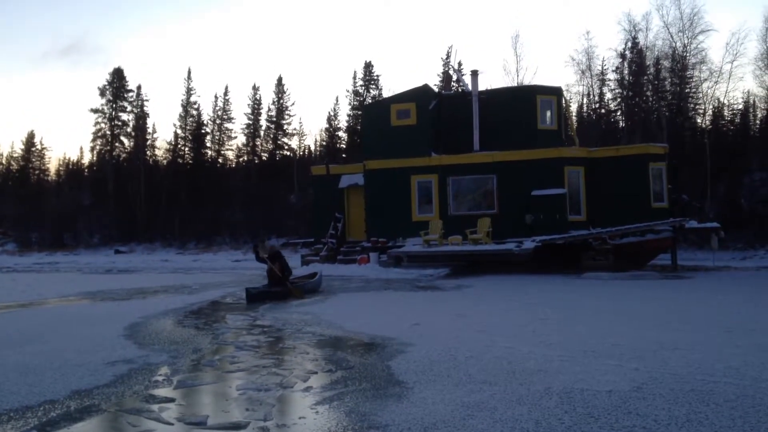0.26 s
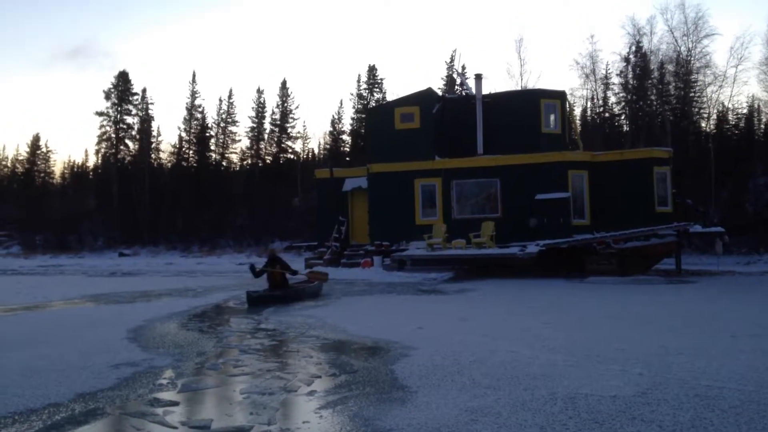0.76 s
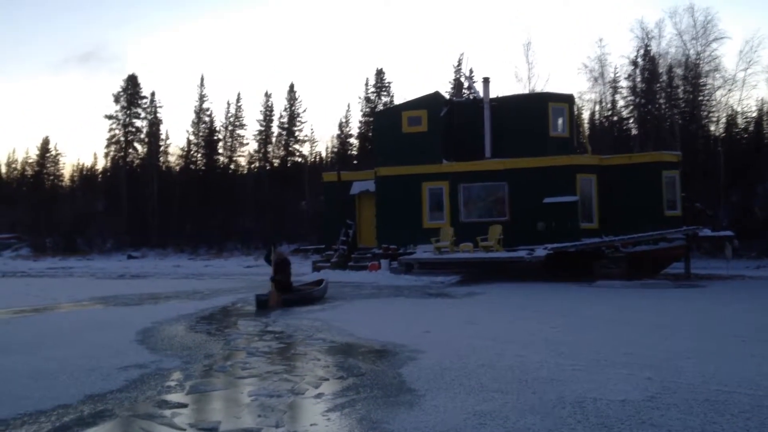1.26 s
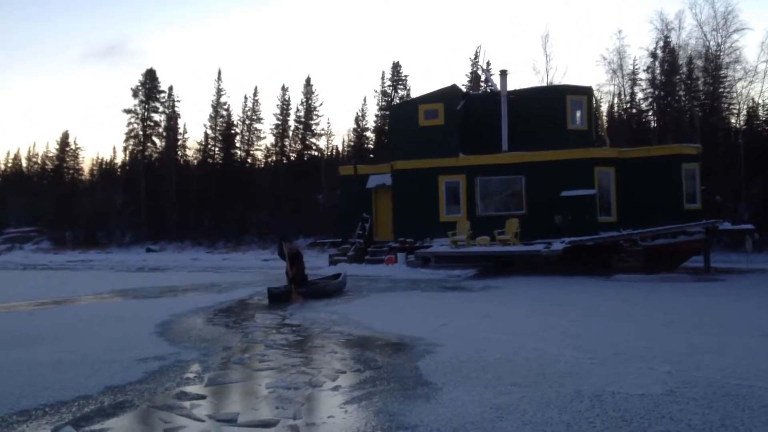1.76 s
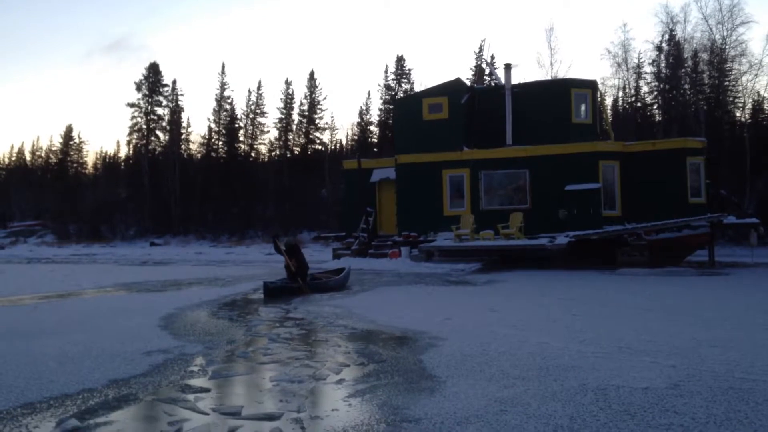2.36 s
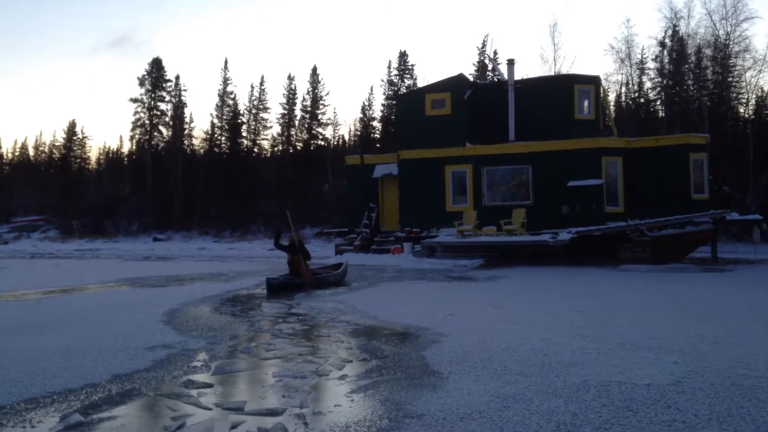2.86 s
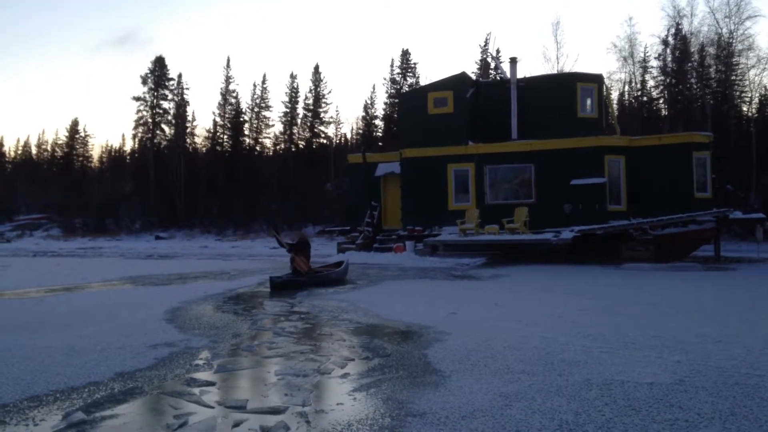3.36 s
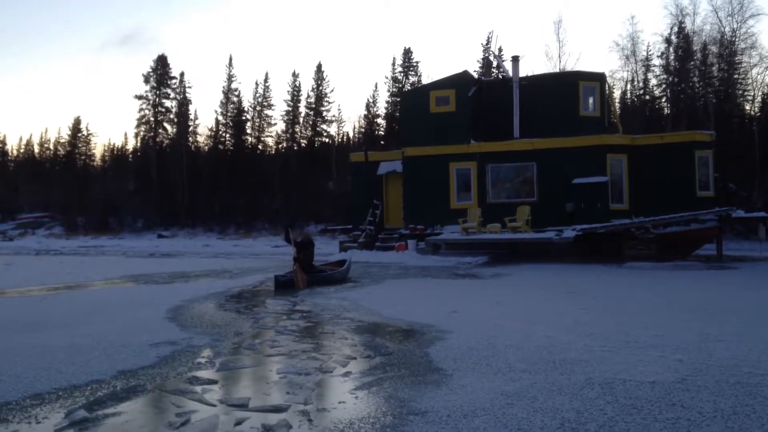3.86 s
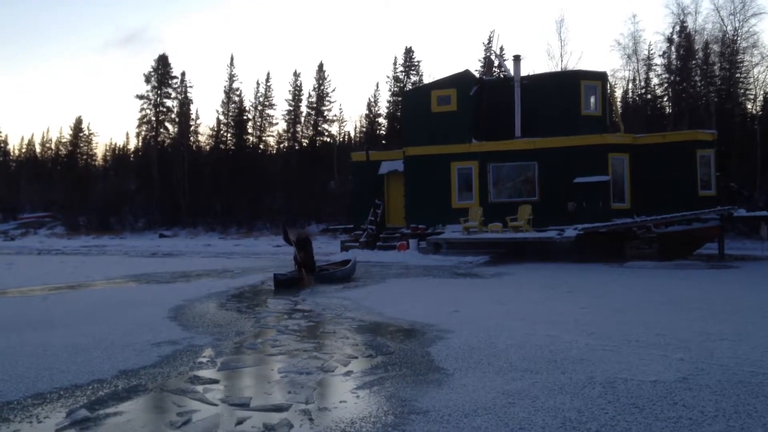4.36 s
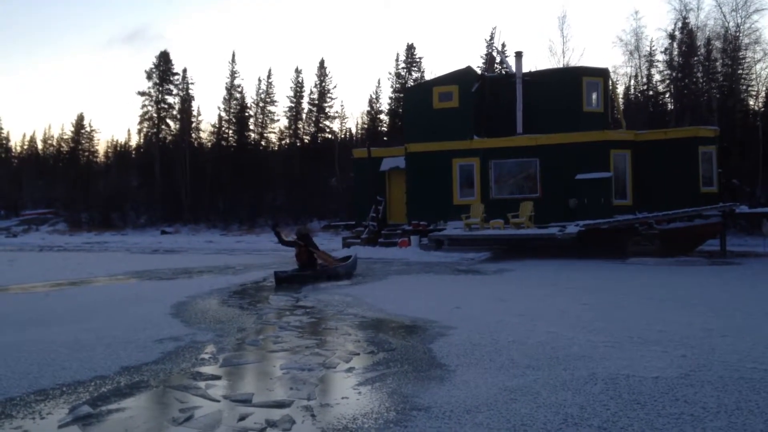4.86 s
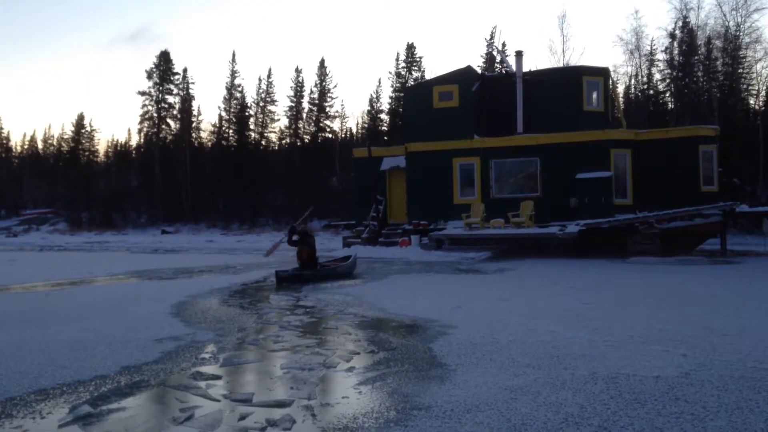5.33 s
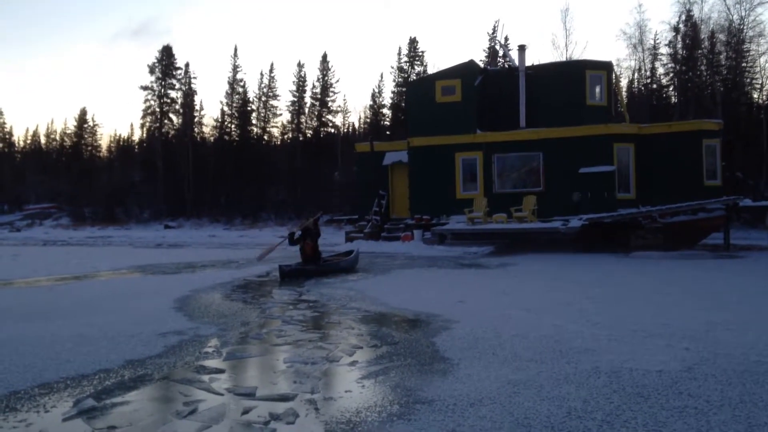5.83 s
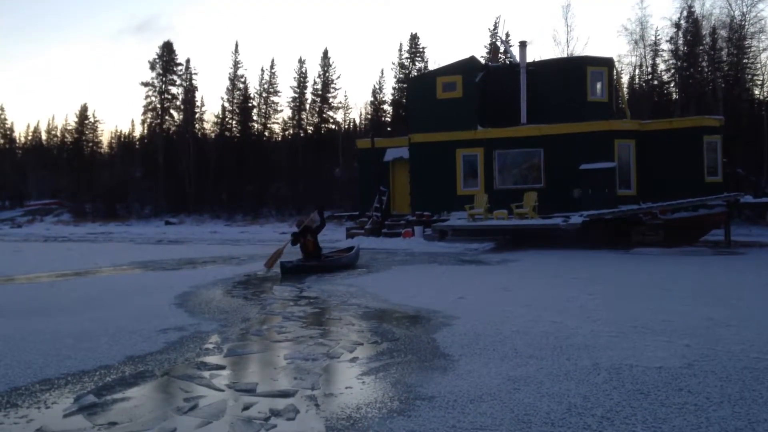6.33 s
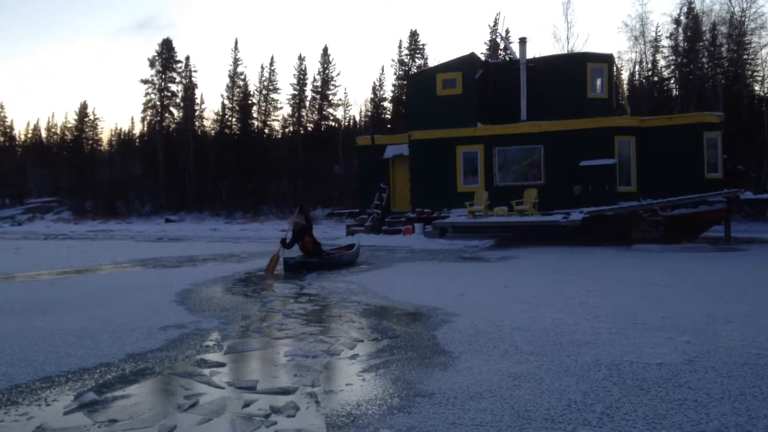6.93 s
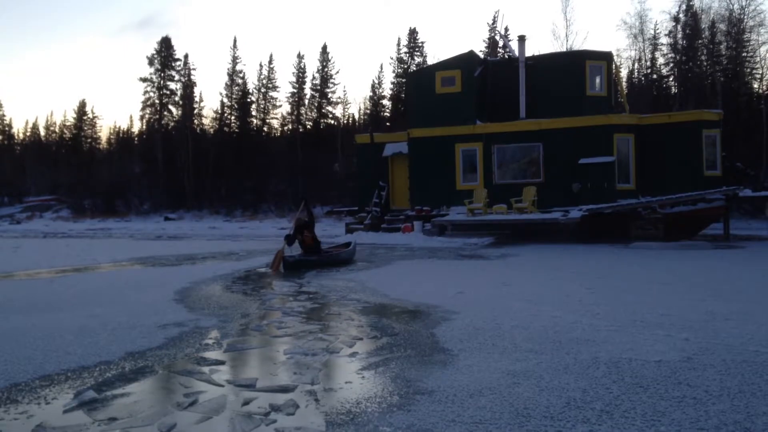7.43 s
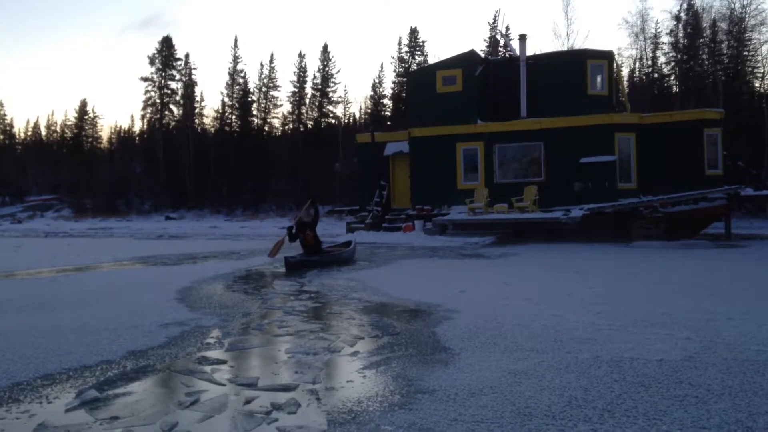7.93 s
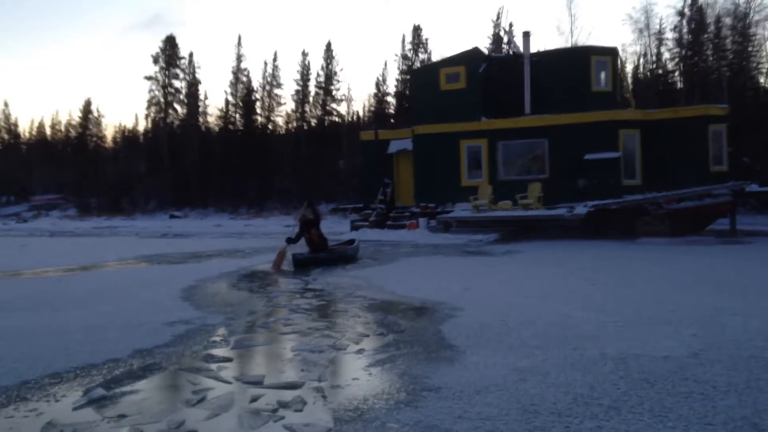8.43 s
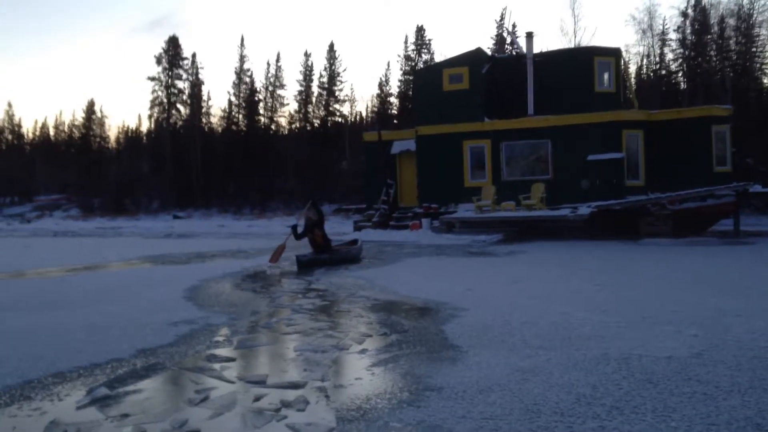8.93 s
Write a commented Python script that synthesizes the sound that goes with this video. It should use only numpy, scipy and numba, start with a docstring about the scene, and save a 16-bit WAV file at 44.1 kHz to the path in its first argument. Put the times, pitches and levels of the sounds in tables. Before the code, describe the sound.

A still, cold lake, heard from some distance, with faint hiss and barely any wind. From 0 to 1.3 seconds a canoe grinds softly against thin ice, with small cracks near 0.4 and 0.9. At 1.4 a very loud, sharp snap begins a heavy burst: crunching, glassy shards and hollow rumbling of slabs under the hull, strongest until about 2.3, with further knocks to 2.9. Quiet follows, with a faint rustle and a drip near 3.7. At 4.0 another crack opens a second dense crunch, hard and splintery until 4.8, then fading with a light trickle. Low thumps and a drip come around 5.5, soft swishes near 6.1. A snap and short crunch strike at 6.6; scraping and crackle run from 7.0 to 7.5. A loud crack with a deep knock hits at 8.2, dull thumps and low wind follow, and a final snap at 9.16. Breaks return one dull echo.

```python
"""Across open lake water on a still, cold morning, a canoe is shoved through thin ice some way off.
The hull rumbles over slabs, while the ice crunches into ringing shards, snaps and ticks.
Slush, a jacket and the paddle swish softly; the paddle also scrapes and drips, and low thumps sound.
Noise bursts and short ringing tones make these sounds.
A wall behind the boat sends back one dull echo, and a light wind and faint hiss lie underneath."""
import sys
import numpy as np
from scipy import signal
from scipy.fft import rfft, irfft
from scipy.io import wavfile
from scipy.ndimage import uniform_filter1d
from numba import njit

SR = 44100
rng = np.random.default_rng(int(sys.argv[2]) if len(sys.argv) > 2 else 0)


def output_pcm(signal):
    """Save a mono or channel-first signal as 16-bit PCM at the path in sys.argv[1].

    Samples are clipped to [-1, 1] before scaling.
    """
    pcm = np.clip(np.atleast_2d(signal).T, -1, 1) * 32767
    wavfile.write(sys.argv[1], SR, np.round(pcm).astype(np.int16))


N = 405274

# panels of the bow that scraping ice or the paddle sets ringing:
# (pitch [Hz], width [Hz], relative level [dB])
BOW_PANELS = [(773, 55, -15.5), (1650, 600, -16.5), (1980, 100, -21.5)]


def undb(db):
    """Turn decibels into a gain to multiply by."""
    return 10 ** (np.asarray(db) / 20)


def level(x, db):
    """Scale a sound to an average (rms) level in dB."""
    return x * undb(db) / np.sqrt(np.mean(x ** 2))


def colour(x, points):
    """Shape the spectrum through (Hz, dB) points, with a filter that never sounds ahead of its input."""
    hz, db = np.transpose(points)
    grid = np.maximum(np.fft.rfftfreq(2 ** 12, 1 / SR), 1)
    gain = undb(np.interp(np.log(grid), np.log(hz), db))
    # folding the cepstrum (the transform of the log gain) puts the whole response after time zero
    cepstrum = irfft(np.log(gain))
    half = len(cepstrum) // 2
    cepstrum[1:half] *= 2
    cepstrum[half + 1:] = 0
    response = irfft(np.exp(rfft(cepstrum)))
    return signal.fftconvolve(x, response)[:len(x)]


def resonance(x, hz, width_hz):
    """Let through a band round one pitch, as a ringing body does; the gain is 1 at the centre."""
    return signal.lfilter(*signal.iirpeak(min(hz, .45 * SR), hz / width_hz, fs=SR), x)


def walk(rate):
    """Wander at random: levels drawn `rate` times a second and smoothed twice, with a spread near 1."""
    hold = int(SR / rate)
    steps = np.repeat(rng.standard_normal(1000), hold)[:N]
    return uniform_filter1d(uniform_filter1d(steps, hold), hold) * 4 / 3


def grains(rate, spread_db, smear_s):
    """Scatter random fractures of very uneven size, each a short noisy burst."""
    hit, size, hiss = rng.random(N), rng.exponential(size=N), rng.standard_normal(N)
    power = (hit < rate / SR) * undb(2 * spread_db * np.minimum(size, 5))
    fade = np.exp(-1 / (smear_s * SR))
    smeared = signal.lfilter([1], [1, -fade], power)
    return level(hiss * np.sqrt(smeared + 1e-9), 0)


@njit
def ring(start, pole, size, count):
    """Ring each piece as one damped vibration, run until it has died away."""
    out = np.zeros(count)
    for k in range(len(start)):
        z, i = size[k] + 0j, start[k]
        while i < count and abs(z) > size[k] / 300:
            out[i] += z.imag
            z *= pole[k]
            i += 1
    return out


def shards(rate, lo_hz, hi_hz, cycles, spread_db):
    """Scatter pieces of all sizes in time, each ringing a few cycles at a pitch of its own."""
    when, pitch, size, long = rng.random((20000, 4))[:int(rate * N / SR)].T
    hz = lo_hz * (hi_hz / lo_hz) ** pitch
    # one step of the vibration: a small turn and a small loss
    pole = np.exp((2j * np.pi - 1 / (cycles * (.5 + long))) * hz / SR)
    size = undb(spread_db * size) * np.sqrt(hz / cycles)
    return level(ring((when * N).astype(np.int64), pole, size, N), 0)


def effort(rest_db, lag_s, stretch, order):
    """Level in dB of crunch (order 0) or rumble (order 1): shoves hold and settle, slabs peak on top."""
    # shoves of the boat into the sheet:
    # (full push from [s], held [s], settling time [s], crunch level [dB], rumble level [dB])
    shove_rows = [(0.0, 0.71, 0.44, -58.5, -58), (1.376, 0.79, 0.85, -57, -59.5),
                  (2.6, 0.25, 0.037, -68, -59), (3.967, 0.52, 0.78, -52.5, -58),
                  (6.622, 0.017, 0.19, -57, -58.5), (7.029, 0.42, 0.38, -60.5, -64),
                  (8.179, 0.017, 0.56, -57.5, -65.5), (9.139, 0.12, .1, -59.5, -63)]
    # slabs that give way at the bow and then knock under the keel:
    # (peak time [s], fading time before stretching [s], crunch level [dB], rumble level [dB])
    slab_rows = [(0.43, 0.14, -62.5, -46), (0.871, 0.092, -56.5, -59), (1.394, 0.028, -47.5, -43),
                 (1.458, 0.033, -43, -43), (1.638, 0.042, -44.5, -37.5), (1.704, 0.038, -45, -47),
                 (1.776, 0.046, -48, -47), (1.888, 0.05, -45, -33), (2.042, 0.037, -61.5, -33.5),
                 (2.164, 0.14, -48.5, -36), (2.277, 0.028, -53.5, -47), (2.536, 0.054, -57, -51.5),
                 (2.765, 0.046, -53.5, -66), (2.841, 0.046, -51.5, -37.5), (4.0, 0.011, -67, -42),
                 (4.088, 0.065, -47, -49), (4.297, 0.046, -52.5, -45), (4.337, 0.018, -41, -47),
                 (4.395, 0.079, -56.5, -45), (4.455, 0.029, -51, -44.5), (4.608, 0.021, -43, -43.5),
                 (4.677, 0.02, -45.5, -47), (7.116, 0.12, -56, -58)]
    attack_s = 0.0057
    slab_fade_db, slab_rise_share = 14, 1  # drop over the fading time; the rise takes this share of it
    step = 2 ** 6  # the level is worked out once every 64 samples
    t = np.arange(0, N + step, step) / SR - lag_s
    rest_power = undb(2 * rest_db)
    power = rest_power + 0 * t
    for s, held, settle, *db in shove_rows:
        onset = np.clip((t - s) / attack_s + 1, 0, 1)
        push = onset * np.exp(-np.maximum(t - s - held, 0) / settle)
        power += undb(2 * (rest_db + (db[order] - rest_db) * push)) - rest_power
    for s, fading, *db in slab_rows:
        away = np.maximum(t - s, (s - t) / slab_rise_share) / (fading * stretch)
        power += undb(2 * (db[order] - slab_fade_db * away))
    power_db = 10 * np.log10(np.maximum(power, 1e-12))
    return np.interp(np.arange(N), np.arange(len(t)) * step, power_db)


def rumble(db):
    """Slabs bump along the keel and shake each mode of the hull by turns; water gulps under them."""
    # modes, the hull's own ways of vibrating: (pitch [Hz], width [Hz], relative level [dB])
    hull_modes = [(70, 140, -18), (147, 18, 1), (188, 15, 1.5), (233, 50, -5.5), (319.5, 16, -2),
                  (367, 120, -9.5), (651, 52, -11)]
    bumps = grains(100, 2.9, 0.0019)
    shell = np.zeros(N)
    for k, (hz, width_hz, mode_db) in enumerate(hull_modes):
        sign = (-1) ** k  # neighbouring modes move in opposite directions
        shell += sign * undb(mode_db + 3.8 * walk(27)) * resonance(bumps, hz, width_hz)
    gulps = shards(70, 118.5, 476.8, 4.6, 11.6)
    return undb(db) * (level(shell, -0.39) + level(gulps, 0.17))


def crunch(db):
    """The bow crushes the sheet: ringing shards over grit, with fine cracks and splinters on top."""
    # tone colour of the breaking pieces: (frequency [Hz], relative level [dB])
    ice_colour = [(290, -32), (500, -1), (1130, -5), (1340, -2), (2280, -9), (3220, -1.5), (6000, -14),
                  (7800, -14.5), (13200, -120)]
    # tone colour of the fine splinters: (frequency [Hz], relative level [dB])
    splinter_colour = [(2350, -39.5), (4000, 9), (6740, 0.5), (13600, -5.5), (15500, -36.5)]
    grit = grains(900, 0.71, 0.002)
    hard = np.clip((db + 72) / 18, .1, 1)  # a gentle push only grinds, a hard one breaks shards off
    mixed = hard * level(shards(450, 600.4, 4144, 9.2, 17.0), -5.5)
    mixed = mixed + level(grit, -0.5) + level(grains(150, 0.8, 0.0015), -8.0)
    # thick and thin pieces break by turns, so each octave comes in clumps of its own
    clumps = np.zeros(N)
    for hz in 600 * 2. ** np.arange(4):
        band = resonance(mixed, hz, hz / np.sqrt(2)) / np.sqrt(hz)
        clumps += undb(3.5 * hard * walk(40)) * band
    pieces = colour(clumps, ice_colour)
    panels = np.zeros(N)
    for hz, width_hz, panel_db in BOW_PANELS:
        panels += level(resonance(grit, hz, width_hz), panel_db + 3.6 * walk(6.4))
    fine = grains(1200, 1.07, 0.00067) + level(grains(110.0, 3.8, 0.0016), -1.4)
    splinters = colour(fine, splinter_colour)
    together = level(pieces, -0.37) + panels + level(splinters, -9.5)
    return undb(db + 1.0 * hard * walk(60)) * together


def knock(t, hz, phases):
    """A low knock that starts late, swells and dies within a few cycles; the peak is 1."""
    lag_s, fade_cycles, overtone_db = 0.00188, 0.95, -5.5
    turns = np.maximum(t - lag_s, 0) * hz
    tone = np.sin(2 * np.pi * turns + phases[0])
    tone += undb(overtone_db) * np.sin(2 * np.pi * 1.96 * turns + phases[1])
    swell = turns * np.exp(-turns / fade_cycles) * tone
    return swell / np.abs(swell).max()


def snaps():
    """In each snap a slab rings briefly, a broad crack dies sooner, and the hull gives a low knock."""
    # (time [s], peak of slab and crack [dB], ringing pitch [Hz], knock peak [dB], knock pitch [Hz])
    snap_rows = [(0.404, -34.5, 1950, -34.5, 159.5), (0.899, -43.5, 1380, -44, 654),
                 (1.385, -11, 1480, -26.5, 355), (1.5797, -32, 1520, -31.5, 306),
                 (1.758, -31, 1440, -55, 573), (1.952, -26, 1300, -29.5, 201),
                 (2.0373, -38, 1070, -28, 339), (2.2663, -36.5, 1990, -33, 251),
                 (2.849, -44, 1265, -29, 135), (3.975, -19.5, 3830, -35.5, 190),
                 (4.0282, -26.5, 3600, -32, 615), (4.0732, -34.5, 1550, -44, 154),
                 (4.293, -34, 1960, -36, 196), (4.3228, -28.5, 2560, -57, 583),
                 (4.3353, -31.5, 1370, -33, 595), (4.5168, -25.5, 850, -29.5, 217),
                 (4.5977, -31.5, 1760, -42, 153), (6.637, -31.5, 3700, -34, 610),
                 (6.647, -20.5, 1510, -28, 327), (7.0967, -35.5, 1330, -43, 358),
                 (7.189, -38.5, 1680, -49, 795), (8.19, -14.5, 2270, -19, 379),
                 (9.16, -26.5, 3500, -28, 555)]
    out = np.zeros(N)
    t = np.arange(SR // 10) / SR
    noise = rng.standard_normal((len(snap_rows), 3, len(t)))
    fade = np.exp(-t / 0.0029) * (1 - np.exp(-t / 0.0024))
    debris = undb(-29.5) * np.exp(-t / 0.015)  # chips scatter after the break
    dull = signal.butter(3, 6140, fs=SR)  # distance has taken the top off, above this many Hz
    for (s, db, hz, knock_db, knock_hz), (crack_noise, slab_noise, phases) in zip(snap_rows, noise):
        broad = resonance(crack_noise * (fade ** 2.08 + debris), 1800, 3900)
        crack = signal.lfilter(*dull, broad) + undb(-15) * crack_noise * fade ** 3
        slab = signal.lfilter(*dull, resonance(slab_noise * fade, hz, hz / 3))
        burst = level(slab, 0.49) + level(crack, 0)
        both = undb(db) * burst / np.abs(burst).max() + undb(knock_db) * knock(t, knock_hz, phases)
        i = int(s * SR)
        out[i:i + len(t)] += both[:N - i]
    return out


def thumps():
    """Low thumps with no crack on top: dull knocks on the hull, the lowest perhaps puffs of wind."""
    # (time [s], peak level [dB], pitch [Hz])
    thump_rows = [(2.803, -32, 341), (4.369, -37.5, 186), (5.447, -46, 275), (5.474, -50, 417),
                  (6.725, -44, 214), (7.305, -40.5, 170), (7.718, -48.5, 170), (8.598, -45, 132),
                  (8.687, -47, 81), (8.803, -44.5, 63.3)]
    out, t = np.zeros(N), np.arange(SR // 10) / SR
    for (s, db, hz), phases in zip(thump_rows, rng.standard_normal((len(thump_rows), 2))):
        i = int(s * SR)
        out[i:i + len(t)] += undb(db) * knock(t, hz, phases)
    return out


def ticks():
    """Small cracks run through the sheet, each a bright burst of a few thousandths of a second."""
    # (time [s], peak level [dB])
    tick_rows = [(1.3759, -26), (1.08, -54), (1.467, -38), (1.7192, -37.5), (4.2429, -36.5),
                 (4.6087, -32.5), (4.6693, -49), (4.7936, -47), (5.464, -49), (5.479, -47.5), (6.5746, -44),
                 (7.021, -45), (7.1372, -48), (7.3374, -43.5), (8.4846, -39.5)]
    t = np.arange(SR // 40) / SR
    bursts = rng.standard_normal((len(tick_rows), len(t))) * np.exp(-t / 0.0031)
    out = np.zeros(N)
    for (s, db), burst in zip(tick_rows, bursts):
        burst = resonance(resonance(burst, 2500, 6100), 3200, 7600)
        i = int(s * SR)
        out[i:i + len(t)] += undb(db) * burst / np.abs(burst).max()
    return out


def scrape():
    """The paddle drags along the edge of the bow; dense catches of its blade ring the bow panels."""
    start_s, length_s, scrape_db = 7.04, 0.45, -47
    u = (np.arange(N) / SR - start_s) / length_s  # runs from 0 to 1 during the drag
    catches = grains(900, 1.5, 0.0014) * undb(2.0 * walk(25))
    panels = np.zeros(N)
    for hz, width_hz, db in BOW_PANELS:
        panels += level(resonance(resonance(catches, hz, width_hz), hz, 2 * width_hz), db)
    drag = np.clip(12 * np.minimum(u, 1 - u), 0, 1)
    return undb(scrape_db) * drag * panels


def mirrored(x):
    """Add a faint, slightly late reflection off the flat ice, gently rippling the spectrum."""
    late_s, mirror_db = 0.000508, -19.5
    samples = np.arange(N)
    return x + undb(mirror_db) * np.interp(samples - late_s * SR, samples, x)


def echo(x):
    """One late return from the wall: the lows come back whole, the highs blurred by its ledges."""
    delay_s, echo_db, low_hz, blur_s = .078, -11.5, 320, 0.0064
    t = np.arange(SR // 20) / SR
    scatter = rng.standard_normal(len(t)) * np.exp(-t / blur_s)
    scatter /= np.sqrt(np.sum(scatter ** 2))
    ledges = signal.fftconvolve(resonance(x, 1800, 2500), scatter)[:N]
    back = signal.lfilter(*signal.butter(2, low_hz, fs=SR), x) + undb(-10.5) * ledges
    return undb(echo_db) * np.concatenate([np.zeros(int(delay_s * SR)), back])[:N]


def swishes():
    """Soft hissy noises swell and stop: slush sliding on the sheet, a jacket rustling, the paddle skimming."""
    # (time [s], length [s], centre [Hz], width of each of two filters [Hz], rms before the swell [dB])
    swish_rows = [(4.584, 0.048, 11400, 5160, -48), (1.795, 0.15, 1400, 890, -50.5),
                  (2.41, 0.053, 1070, 700, -50.5), (4.06, 0.07, 1720, 1200, -41),
                  (4.419, 0.07, 1060, 900, -44), (3.386, 0.046, 4700, 6000, -64),
                  (5.25, 0.076, 6700, 6100, -63), (6.137, 0.15, 5300, 2540, -62),
                  (6.166, 0.11, 2760, 1510, -61.5), (6.758, 0.11, 6000, 9050, -62.5),
                  (7.016, 0.28, 6040, 7000, -63), (7.326, 0.22, 5460, 7900, -60.5),
                  (8.624, 0.21, 4720, 9200, -62)]
    out, hiss = np.zeros(N), grains(3400, 4.4, 0.00096)
    for s, length, hz, width_hz, db in swish_rows:
        u = np.linspace(0, 1, int(length * SR))
        i = int(s * SR)
        band = resonance(resonance(hiss[i:i + len(u)], hz, width_hz), hz, width_hz)
        out[i:i + len(u)] += np.sin(np.pi * u) * level(band, db)
    return out


def drips():
    """A bubble under each drop sings upward, unsteadily; a trickle of shorter ones runs off the blade."""
    # drops off the paddle: (time [s], starting pitch [Hz], peak before the wobble [dB])
    drip_rows = [(3.668, 615, -55), (5.596, 660, -51.5)]
    drip_s, rise_ratio = 0.037, 2.2  # a full-length drop climbs by this ratio, a shorter one by less
    trickle_s, trickle_length_s, trickle_db = 4, 0.9, -54  # the trickle follows the long shove
    out = np.zeros(N)
    when, pitch, size = rng.random((30, 3)).T
    starts = trickle_s + trickle_length_s * when ** 2  # crowded at first, then thinning out
    lengths = drip_s / (2 + 2 * pitch)
    trickle = zip(starts, 380 * 5 ** pitch, trickle_db - 10 * size, lengths)
    wobble = walk(150)
    for s, hz, db, length in [(*row, drip_s) for row in drip_rows] + list(trickle):
        u = np.linspace(0, 1, int(length * SR))
        i = int(s * SR)
        glide = hz * rise_ratio ** (u * length / drip_s)
        tone = np.sin(2 * np.pi * np.cumsum(glide) / SR)
        out[i:i + len(u)] += undb(db + 3.9 * wobble[i:i + len(u)]) * np.sin(np.pi * u) ** 2 * tone
    return out


def wind():
    """Slow puffs of air on the microphone port make a low, unsteady noise."""
    # wind before its random puffing: (time [s], level [dB])
    wind_rows = [(0.0, -70.5), (7.5, -69), (8.0, -62.5), (9.19, -62.5)]
    db = np.interp(np.arange(N) / SR, *np.transpose(wind_rows))
    puffs = resonance(resonance(rng.standard_normal(N), 69.5, 67), 69.5, 67)
    return undb(db + 2.1 * walk(13)) * level(puffs, 0)


def air():
    """Still air over the lake and the microphone's own hiss: shaped noise that wavers slightly."""
    # tone colour of the quiet: (frequency [Hz], relative level [dB])
    air_colour = [(35, -33), (60, -20), (149, 6), (721, -10.5), (976, -14), (1910, -13.5), (2780, -25.5),
                  (3340, -14.5), (15500, -17.5)]
    hiss = colour(rng.standard_normal(N), air_colour)
    return level(hiss, -69) * undb(0.36 * walk(11.0))


def scene():
    """Add up boat, ice and paddle, their echo, and the quiet air."""
    # the rumble comes a little later than the crunch, and its slabs last longer
    keel_db = effort(rest_db=-72.5, lag_s=0.0063, stretch=1, order=1)
    bow_db = effort(rest_db=-73, lag_s=0, stretch=0.91, order=0)
    boat = mirrored(rumble(keel_db) + crunch(bow_db) + snaps() + thumps() + ticks() + scrape())
    return (boat + echo(boat) + swishes() + drips() + wind() + air())[None]


def record(dry):
    """The microphone drops the deepest bass (below 36 Hz) and cuts the top (above 15400 Hz)."""
    thin = signal.sosfilt(signal.butter(2, 36, "high", fs=SR, output="sos"), dry)
    return signal.sosfilt(signal.ellip(10, .2, 60, 15400, fs=SR, output="sos"), thin)


dry = scene()
out = record(dry)
output_pcm(out)
```